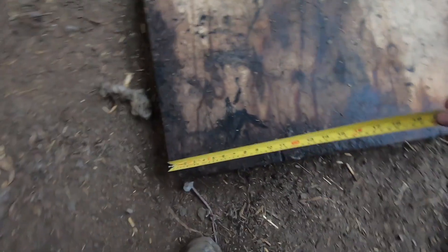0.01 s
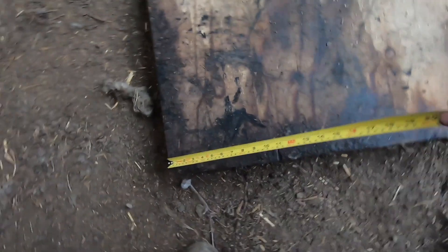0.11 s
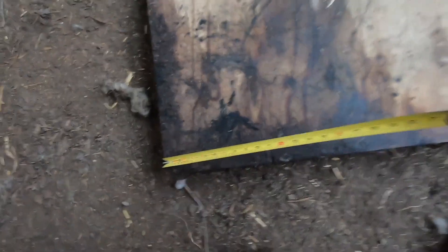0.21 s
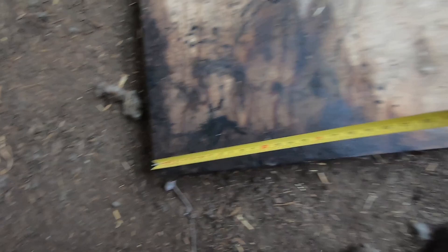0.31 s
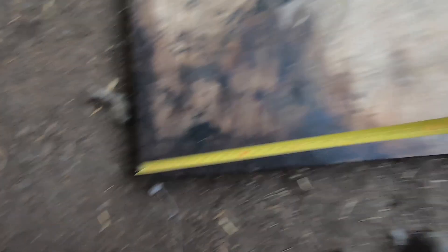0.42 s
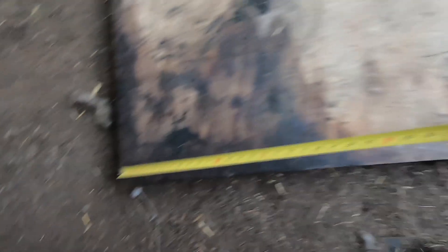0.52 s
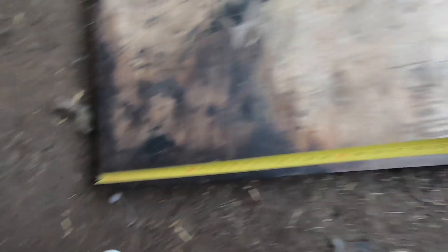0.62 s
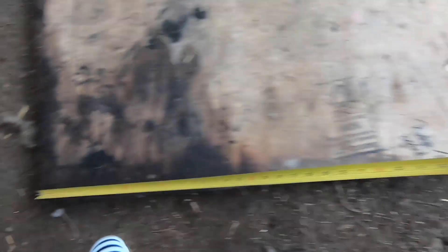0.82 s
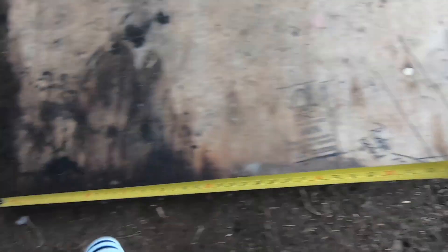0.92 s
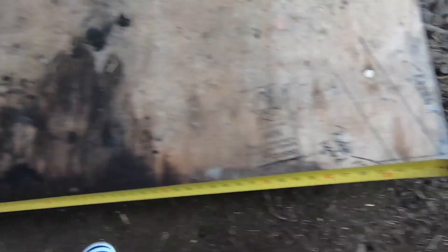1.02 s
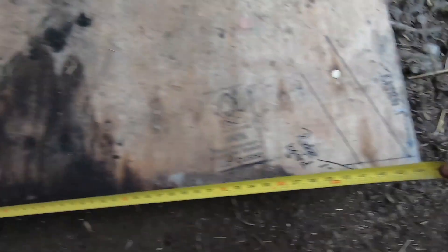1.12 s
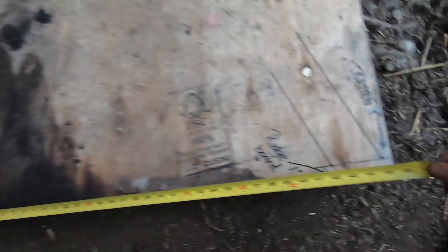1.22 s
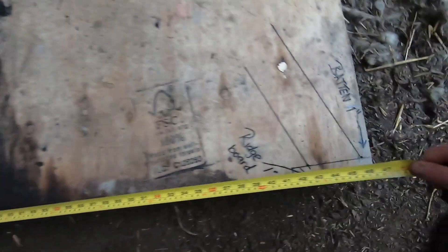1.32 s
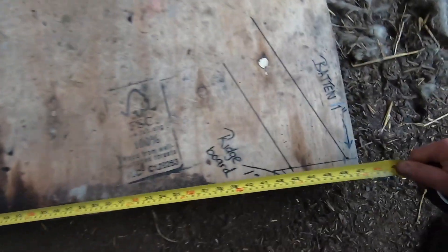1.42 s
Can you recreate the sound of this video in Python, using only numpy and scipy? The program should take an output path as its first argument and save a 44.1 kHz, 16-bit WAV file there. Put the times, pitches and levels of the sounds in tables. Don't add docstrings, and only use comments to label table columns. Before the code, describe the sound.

A steel tape measure is drawn out beside a plywood board: a small snap, quickening gritty rasp, a hard low thump, a springy clack, then steady sliding hiss with sparse clicks, close microphones in a quiet shed.

```python
import sys
import numpy as np
from scipy import signal
from scipy.fft import rfft
from scipy.io import wavfile
from scipy.ndimage import uniform_filter1d

SR = 44100
rng = np.random.default_rng(int(sys.argv[2]) if len(sys.argv) > 2 else 0)


def boost(x):
    u = np.asarray(x, float) / 20
    return 10 ** u


def bounce(signal):
    frames = np.transpose(np.atleast_2d(signal))
    limited = np.clip(frames, -1, 1)
    pcm = np.round(limited * 32767).astype(np.int16)
    wavfile.write(sys.argv[1], SR, pcm)


N = 63945
T = np.arange(N) / SR


def evened(x):
    return x / np.sqrt(np.mean(x ** 2) + 1e-20)


def smooth_twice(x, size):
    return uniform_filter1d(uniform_filter1d(x, size=size), size=size)


def read(points, hz):
    f, value = np.transpose(points)
    return np.interp(np.log(hz + 1), np.log(f + 1), value)


def add(mix, start_s, sound):
    part = mix[..., round(start_s * SR):][..., :sound.shape[-1]]
    part += sound[..., :part.shape[-1]]


def leaned(left_over_right_db):
    return boost([[left_over_right_db / 2], [-left_over_right_db / 2]])


def resonate(x, hz, width_hz):
    r = np.exp(-np.pi * width_hz / SR)
    return 2 * signal.lfilter([1 - r], [1, -r * np.exp(2j * np.pi * hz / SR)], x).real


def grains(per_s, spread_db, length):
    side, chance, size = rng.random((length, 3)).T
    return np.sign(side - .5) * (chance < per_s / SR) * boost(-spread_db * np.log(size + .06))


# (pitch [Hz], likeness [0 to 1])
LIKENESS = [(300, 0.54), (1400, 0.14), (2900, 0.74), (3600, 0.5), (4500, 0.9), (5100, 0.89), (5900, 0.035),
            (14000, 0.059)]
# (pitch [Hz], left over right [dB])
SIDE = [(300, 1.5), (700, -2), (1500, -7), (2800, -5), (4400, -1), (6600, 1.5), (9000, -3), (14400, -11.5)]


def spread(drive, colour_db, patchy_db, same=None):
    hz, _, z = signal.stft(drive, SR, nperseg=512, noverlap=384)
    patches = rng.standard_normal(z.shape[1:])
    patches = uniform_filter1d(patches, size=6, axis=0)
    patches = evened(uniform_filter1d(patches, size=14, axis=1))
    lines = evened(uniform_filter1d(rng.standard_normal(z.shape[1:]), size=24, axis=1))
    likeness = read(LIKENESS, hz) if same is None else np.full(len(hz), same)
    c = np.clip(likeness, -1, 1)[:, None]
    lean = boost(read(SIDE, hz) / 2)[:, None]
    right = c * z[0] + np.sqrt(1 - c ** 2) * z[1]
    pair = np.array([z[0] * lean, right / lean])
    pair *= boost(colour_db(hz)[:, None] + patchy_db * np.clip(patches, -3, 2) + 2.63 * lines)
    return evened(signal.istft(pair, SR, nperseg=512, noverlap=384)[1][:, :N])


def swells(table):
    wobble = 0.14
    out = np.zeros(N)
    for start, length, db, hz in table:
        wander = evened(smooth_twice(rng.standard_normal((2, 8000)), 500))[:, :round(length * SR)]
        shape = np.sin(np.pi * np.linspace(0, 1, wander.shape[1])) * boost(1.5 + 2.5 * wander[0])
        turns = np.cumsum(hz * (1 + wobble * wander[1])) / SR
        add(out, start, boost(db) * shape * np.sin(2 * np.pi * turns))
    return out


# (pitch [Hz], level per Hz [dB])
SHED_AIR = [(100, -46), (180, 0.5), (337, -24.5), (746, -12), (1020, -19.5), (2360, -22), (8000, -31),
            (9200, -52), (13500, -68)]


def shed():
    air = spread(rng.standard_normal((2, N)), lambda hz: read(SHED_AIR, hz), patchy_db=1.0, same=0.13)
    whine = evened(resonate(rng.standard_normal(N), hz=1887, width_hz=72))
    return boost(-62.5) * air + boost(-71) * whine * leaned(-4.2)


# (pitch [Hz], level [dB])
DRAUGHT_COLOUR = [(10, -4), (30, 0), (48, -4), (65, -18), (85, -40)]
# (start [s], length [s], level [dB], pitch [Hz])
PUFFS = [
    (.07, 0.043, -70, 54.3),
    (.245, 0.058, -51.5, 74),
    (.415, 0.018, -44, 66.5),
    (.418, 0.016, -41, 117),
    (.455, 0.057, -50.5, 78.7),
    (.93, 0.06, -56, 76.5),
    (1.23, 0.049, -59.5, 70),
    (1.275, 0.088, -54, 48.5),
    (1.34, 0.086, -60, 76),
    (1.395, 0.06, -53, 45.4),
]


def draught():
    colour = boost(read(DRAUGHT_COLOUR, np.fft.rfftfreq(N, 1 / SR)))
    a, b = np.fft.irfft(rfft(rng.standard_normal((2, N))) * colour, N)
    steady = boost(-70.5) * evened(np.array([a, a + 1.1 * b]))
    return steady + np.array([[1.09, 0.26], [0.31, 0.83]]) @ [swells(PUFFS), swells(PUFFS)]


def walls(x):
    t60_s = 0.089
    at = np.arange(200, 8000, 22) + rng.integers(0, 22, (2, 355))
    echoes = rng.choice([-1., 1.], at.shape) * boost(-60 * at / SR / t60_s)
    taps = np.zeros((2, 8100))
    np.put_along_axis(taps, at, echoes, axis=1)
    return signal.fftconvolve(x, taps / np.linalg.norm(taps[0]), axes=1)[:, :N]


# (time [s], rasp level [dB], extra grit [dB], pressure on the board [dB])
PULL = [(0, -88, -10, -67), (.1, -75.5, 8, -77.5), (.125, -68, 23, -75.5), (.15, -66, 20, -70),
        (.19, -61, 15, -62), (.21, -56.5, 13, -52.5), (.26, -48, 7, -37.5), (.32, -50.5, 7.5, -63),
        (.37, -47.5, 3, -63), (.43, -48.5, 3, -48), (.56, -46, 3, -57.5), (.67, -45, -2, -55),
        (.74, -49.5, 3.5, -63), (.81, -48, -2.5, -70.5), (.92, -49.5, 1.5, -71.5), (1.1, -50.5, 1.5, -72),
        (1.3, -52, 3, -67), (1.45, -54.5, -4, -79)]


def pull(column):
    rows = np.transpose(PULL)
    return np.interp(T, rows[0], rows[column])


# (pitch [Hz], width [Hz], level [dB])
BOARD_MODES = [(178, 22, 3), (225, 33, 1.5), (263.3, 19.6, 5), (346, 78, -9), (455, 210, -11.5),
               (740, 160, -19.5)]
# (start [s], length [s], level [dB], pitch [Hz])
DRONES = [
    (.49, 0.12, -52.5, 175.5),
    (.63, 0.098, -59, 175),
    (.715, 0.16, -55, 178),
    (.96, 0.07, -59.5, 248),
    (1.13, 0.089, -56.5, 224.2),
]


def board_hum():
    rub = rng.standard_normal(N)
    flutter = evened(uniform_filter1d(rng.standard_normal(N), size=700))
    rub = rub * boost(1.2 * flutter)
    hum = np.zeros(N)
    for hz, width, db in BOARD_MODES:
        hum += boost(db) * resonate(resonate(rub, hz, width), hz, 4.0 * width)
    return (boost(pull(column=3)) * evened(hum) + swells(DRONES)) * leaned(-.6)


# (time [s], level [dB], pitch [Hz], bloom [ms])
KNOCKS = [
    (.1400, -48.5, 250, 8.8),
    (.2120, -48, 185, 6.6),
    (0.2450, -29.5, 222, 5.2),
    (0.274, -41, 252, 7.2),
    (.3600, -48.5, 236, 4.3),
    (0.4108, -40, 320, 1.8),
    (0.4218, -16.5, 200.5, 4.05),
    (0.445, -33.5, 225, 5.5),
    (0.47, -42, 215, 5.5),
    (0.938, -46, 160, 7.5),
]


def knocks():
    overtone, drop_s = 1.92, .001
    out, t = np.zeros((2, N)), np.arange(2600) / SR
    for start, db, hz, bloom_ms in KNOCKS:
        u = t * 1000 / bloom_ms
        turns = hz * (t + 1.15 * drop_s * (1 - np.exp(-t / drop_s)))
        shape = (u * np.exp((1 - u ** 2) / 2)) ** .62
        upper = boost(-22) * np.exp(-u) * np.sin(2 * np.pi * overtone * turns)
        boom = shape * (np.sin(2 * np.pi * turns) + upper)
        noise = rng.standard_normal(len(t))
        crack = evened(resonate(resonate(noise, 550, 990.0), 550, 1200.0))
        crack = crack * np.exp(-t * 1000 / 7.2) * np.minimum(t * 1000, 1)
        add(out, start, boost(db) * (boom + boost(-24.5) * leaned(-19.5) * crack))
    return out * leaned(-.6)


# (start [s], length [s], level [dB], brightness [Hz], width [Hz])
SCRAPES = [
    (.206, 0.096, -48.5, 2900, 2300),
    (.228, 0.058, -48, 810, 1200),
    (.345, 0.031, -47, 3060, 2600),
    (.441, 0.012, -45.5, 780, 860),
    (0.12, 0.043, -61.5, 790, 860),
    (0.48, 0.14, -53, 8000, 2500),
    (1.345, 0.048, -47.5, 5100, 2100),
    (0.577, 0.02, -45, 7500, 2000),
    (1.39, 0.087, -52.5, 3320, 1740),
    (.4356, 0.0094, -45.5, 3100, 1300),
]


def scrapes():
    out = np.zeros((2, N))
    for start, length, db, hz, width_hz in SCRAPES:
        a, b = np.array([grains(5000, 1.2, 5000) for _ in range(2)])[:, :round(length * SR)]
        slips = np.array([a, 0.63 * a + 0.76 * b])
        stroke = np.sin(np.pi * np.linspace(0, 1, len(a)) ** 0.86)
        scrape = evened(resonate(resonate(slips, hz, width_hz), hz, 2 * width_hz))
        add(out, start, boost(db) * stroke * scrape * leaned(-5))
    return out


# (start [s], length [s], level [dB], from [Hz], to [Hz])
WHISTLES = [
    (0.629, .09, -56, 5000, 4800),
    (0.639, .1, -60.5, 2087, 2200),
    (.79, 0.15, -56, 4900, 4750),
    (1.036, 0.11, -58, 3950, 4100),
    (1.156, 0.0495, -57, 3900, 3300),
    (1.172, .11, -58, 7100, 7500),
    (1.264, 0.13, -63, 3940, 4100),
]


def whistles():
    width_hz = 380
    out = np.zeros((2, N))
    for start, length, db, from_hz, to_hz in WHISTLES:
        u = np.linspace(0, 1, round(length * SR))
        noise = rng.standard_normal((2, 8000))
        slow = evened(resonate(resonate(noise, 0, width_hz), 0, width_hz))[:, :len(u)]
        turn = 2 * np.pi * np.cumsum(from_hz + (to_hz - from_hz) * u) / SR
        whistle = slow[0] * np.cos(turn) + slow[1] * np.sin(turn)
        add(out, start, boost(db) * np.sin(np.pi * u) * whistle * np.ones((2, 1)))
    return out


# (time of peak [s], level [dB], pitch [Hz], rise [ms], fall [ms])
RINGS = [(.1281, -43, 4400, .1, 1.6), (.1282, -50, 2200, .15, 1.8), (.1285, -47, 5700, .15, 2.5),
         (.1286, -53, 7600, .15, 2.5), (.1283, -59, 10600, .1, 1.2), (.1285, -62, 12500, .1, 1.5),
         (.137, -51, 700, 4, 8), (.2352, -38, 780, .6, 2.5), (.2432, -38, 1300, .4, 1.5),
         (.260, -39, 330, 2.5, 3), (.2672, -38, 900, .6, 2), (.266, -45, 2700, 2, 3),
         (.2755, -39, 900, 1.5, 2.5), (.435, -34, 235, 2, 4), (.4435, -48, 1050, 1.5, 2),
         (.4212, -41, 800, .4, 1), (.4228, -33, 450, .8, 2), (.6005, -41, 1750, 1.5, 1.2),
         (.600, -40, 3100, 1.8, 1.5), (.6033, -33, 2380, 1.1, 1.6), (.6033, -31.5, 3630, 1.5, 1.6),
         (.6025, -39, 4400, 2.5, 2.5), (1.1472, -36, 3940, .15, 2.5), (1.1472, -40, 2700, .2, 1.5),
         (1.1498, -38, 3490, .6, .9), (1.149, -43, 5230, .9, 1.8), (1.149, -48, 1750, .8, 1),
         (1.158, -45, 3100, 1.5, 2), (1.3535, -43, 4500, 1.2, 1.5), (1.361, -40, 4800, 1.2, 2)]


def rings():
    glide_per_s = 22
    out, t = np.zeros((2, N)), np.arange(-600, 1600) / SR
    for peak, db, hz, rise_ms, fall_ms in RINGS:
        rise = np.exp(-.5 * (t * 1000 / rise_ms) ** 2)
        shape = np.where(t < 0, rise, np.exp(-t * 1000 / fall_ms))
        tone = np.cos(2 * np.pi * hz * t * (1 + glide_per_s * t / 2))
        add(out, peak + t[0], boost(db) * shape * tone * leaned(-4.5 * (hz > 500)))
    return out


# (pitch [Hz], level [dB])
FLEX_MODES = [(1600, -12), (2050, -6), (2450, -1), (3000, -7), (3600, 0), (4400, -6), (5400, -12)]
# (time [s], level [dB], swell [ms], pitch factor [x], left over right [dB])
CLICKS = [(.1292, -41, .7, 1.3, -6), (.2115, -40, .7, 1.4, -6), (.2195, -37, 1.5, .9, -10),
          (.2350, -38, .3, .6, -6), (.2490, -37, .9, 1.2, -6), (.2671, -36, .4, 1.3, -6),
          (.3405, -36, .9, .45, -8), (.6024, -29, 3.1, 1, -10), (.7720, -41, 1.5, 1.05, -5),
          (1.039, -40, 1.2, 1.1, -4), (1.1485, -37, 1.0, 1.08, -5), (1.232, -42, .8, .7, -5)]


def clicks():
    out, t = np.zeros((2, N)), np.arange(-400, 600) / SR
    hz, mode_db = np.transpose(FLEX_MODES)[:, :, None]
    for time, db, swell_ms, pitch, lean_db in CLICKS:
        noise = rng.standard_normal((2, len(FLEX_MODES), len(t)))
        rattle = evened(smooth_twice(noise, 24))
        jitter = 0.63 * rattle[0] + 0.69 * rattle + 9 * noise[0, :, :1]
        modes = boost(mode_db + 3.1 * rattle[0]) * np.sin(2 * np.pi * hz * pitch * t + jitter)
        ring = modes.sum(1) * np.exp(-.5 * (t * 1000 / swell_ms) ** 2)
        add(out, time + t[0], boost(db) * ring / abs(ring).max() * leaned(lean_db))
    return out


# (pitch [Hz], level per Hz [dB])
HISS_COLOUR = [(880, -42), (1500, -14), (1780, -29), (2140, -7), (3020, -12), (4930, 0), (7390, 0.5),
               (13300, -14), (14900, -29)]
# (pitch [Hz], width [Hz], lift [dB])
BLADE_RINGS = [(2080, 420, 1.5), (3530, 180, 4.5), (4200, 280, 2), (4930, 450, -0.5), (5760, 360, 2),
               (7100, 130, -2), (7330, 1200, 4), (8850, 1060, -3), (10170, 880, 4)]
# (pitch [Hz], level per Hz [dB])
GRIT_COLOUR = [(300, 6.5), (700, -4), (1300, 2), (2200, -1.5), (3600, 2.5), (5000, -9.5), (9000, -34),
               (13500, -47)]


def rasp():
    def hiss_db(hz):
        lift = sum(db * np.exp(-2 * ((hz - f) / w) ** 2) for f, w, db in BLADE_RINGS)
        low_cut = 14 * np.log2(np.maximum(1800 / (hz + 1), 1))
        return read(HISS_COLOUR, hz) + lift - low_cut

    flutter = evened(uniform_filter1d(rng.standard_normal(N), size=300))
    rubbing = rng.standard_normal((2, N)) * boost(0.39 * flutter)
    hiss = spread(rubbing, hiss_db, patchy_db=1.5)
    slips = np.array([grains(per_s=2500, spread_db=2, length=N) for _ in range(2)])
    grit = spread(slips, lambda hz: read(GRIT_COLOUR, hz), patchy_db=2.5)
    return boost(pull(column=1)) * (boost(3.0) * hiss + boost(-9 + pull(column=2)) * grit)


def scene():
    near = scrapes() + clicks() + rings()
    heard = rasp() + board_hum() + knocks() + near + boost(-8) * walls(near) + shed()
    lowest = signal.butter(N=2, Wn=105, btype="high", fs=SR, output="sos")
    return signal.sosfiltfilt(lowest, heard) + draught() + whistles()


def band_limit(x):
    return signal.sosfilt(signal.butter(12, 15040, fs=SR, output="sos"), x)


def record(dry):
    soft = signal.sosfilt(signal.butter(N=4, Wn=13700, fs=SR, output="sos"), dry)
    return band_limit(soft)


dry = scene()
out = record(dry)
bounce(out)
```